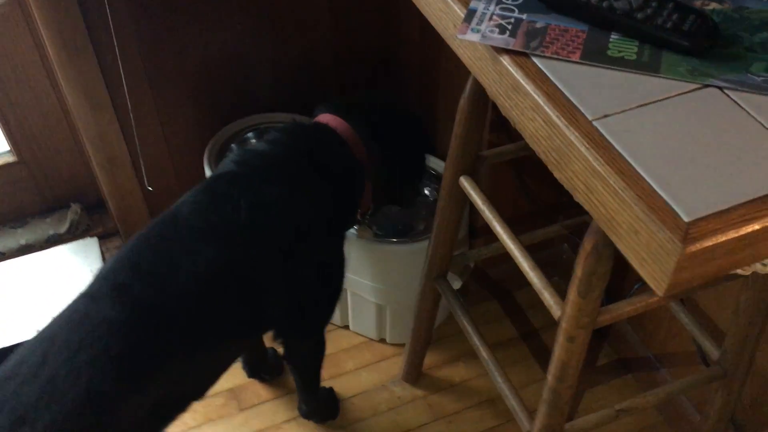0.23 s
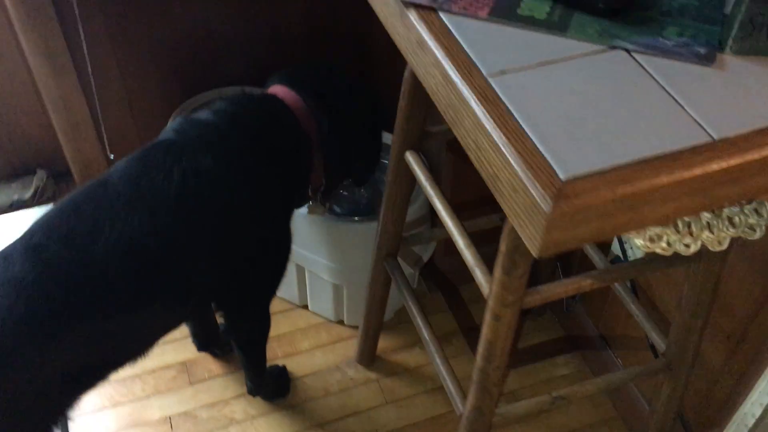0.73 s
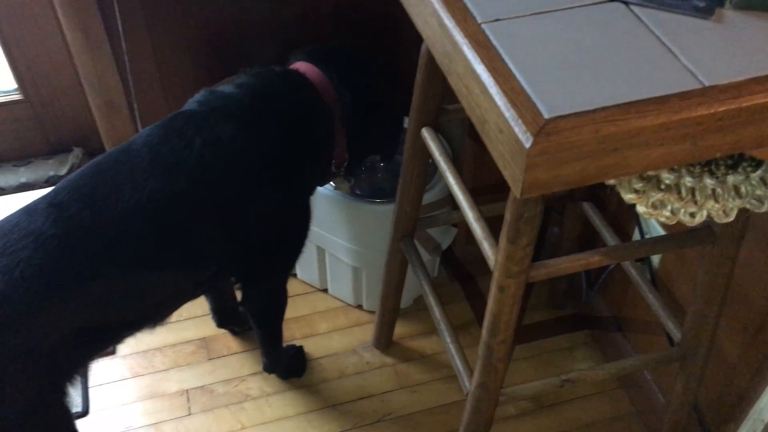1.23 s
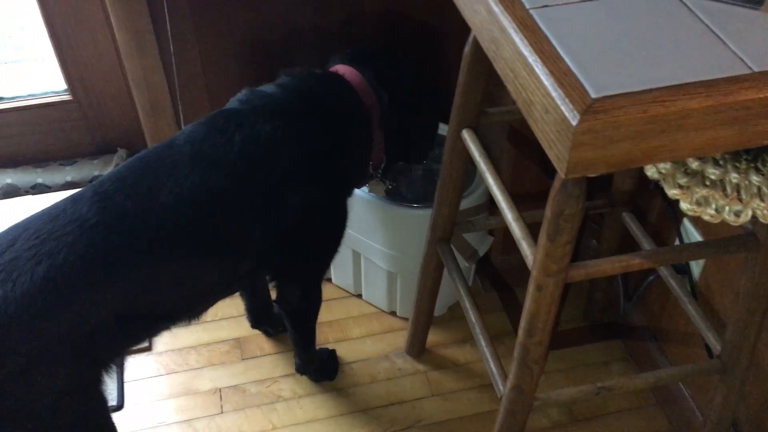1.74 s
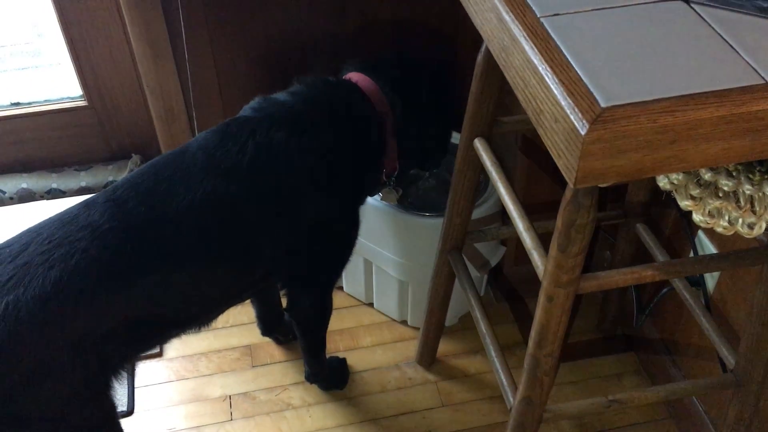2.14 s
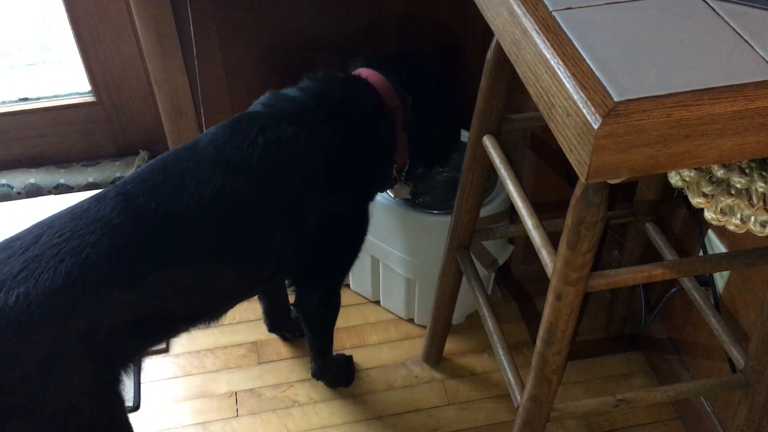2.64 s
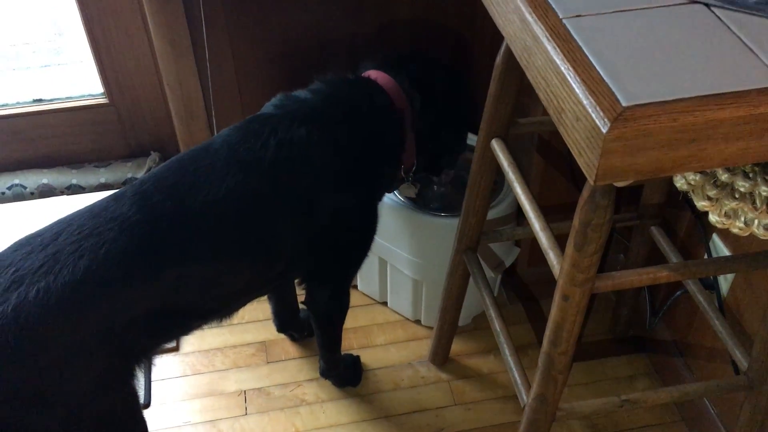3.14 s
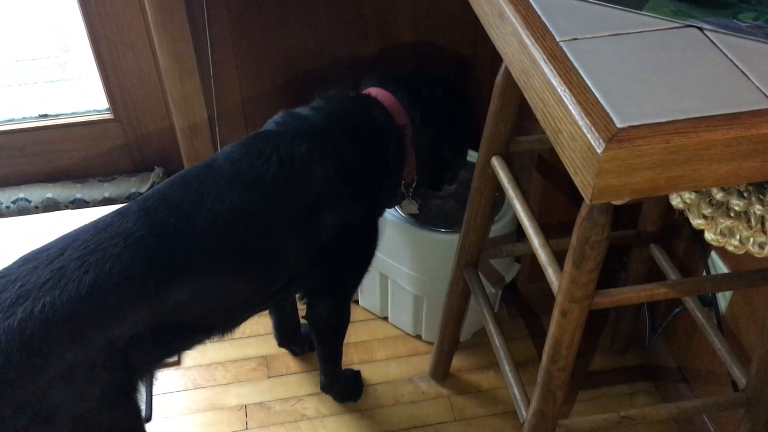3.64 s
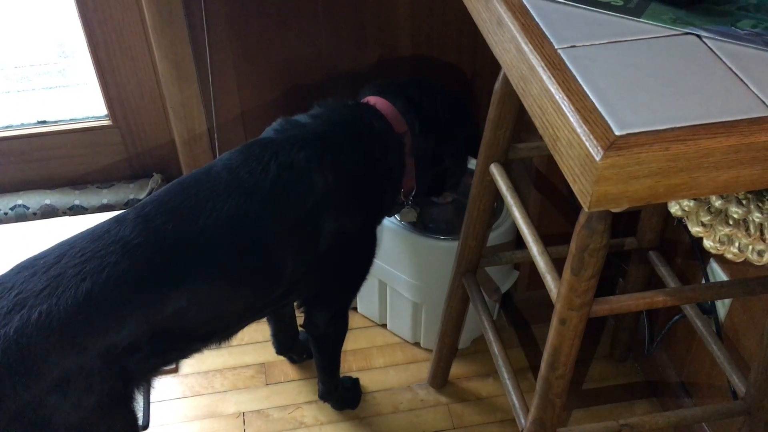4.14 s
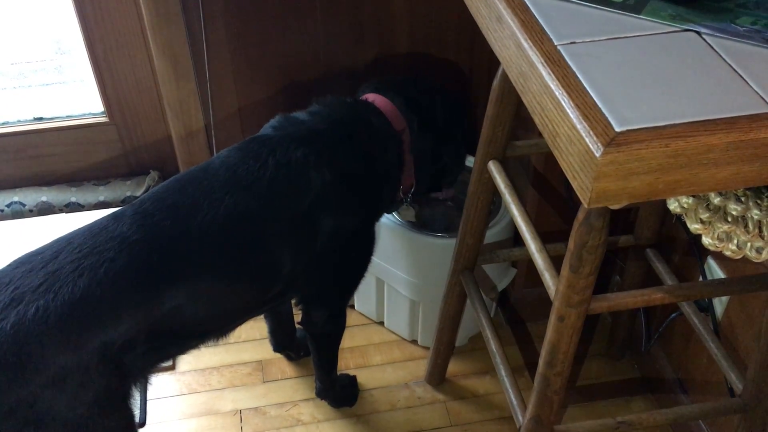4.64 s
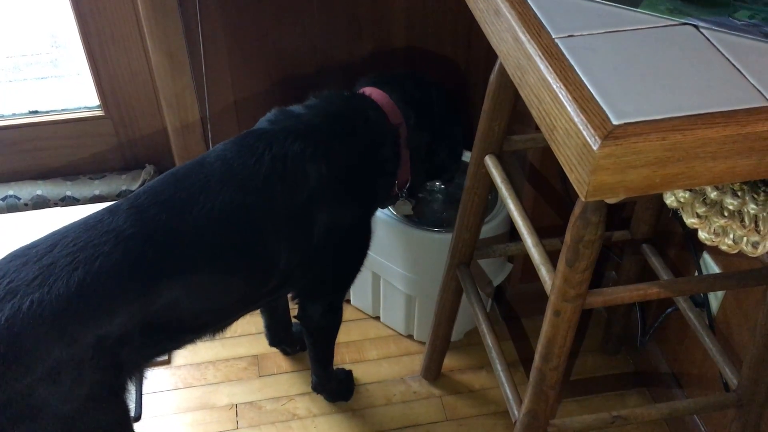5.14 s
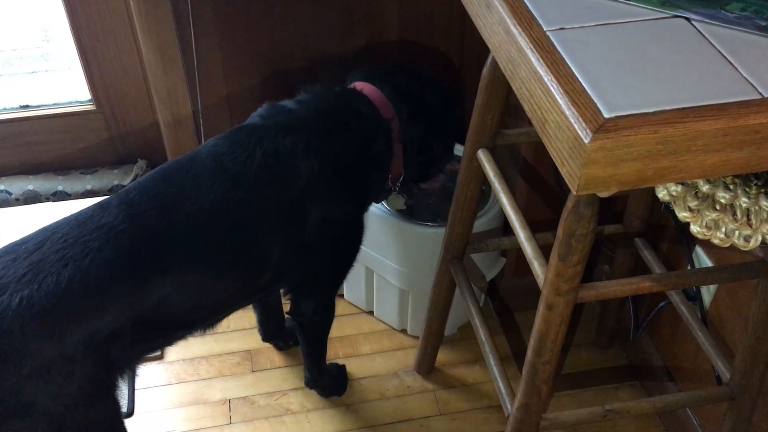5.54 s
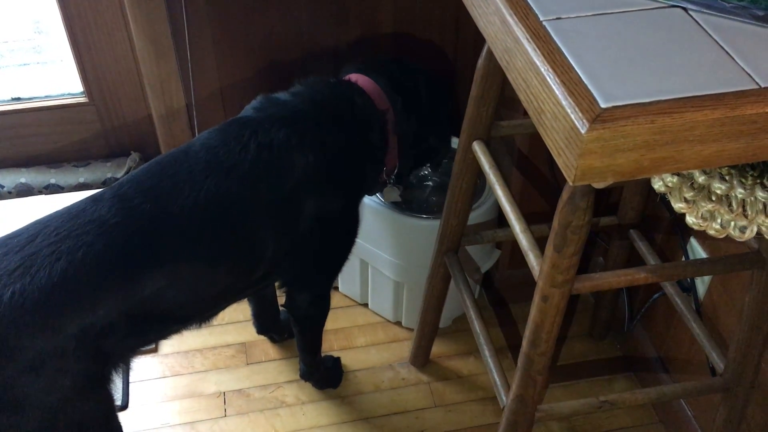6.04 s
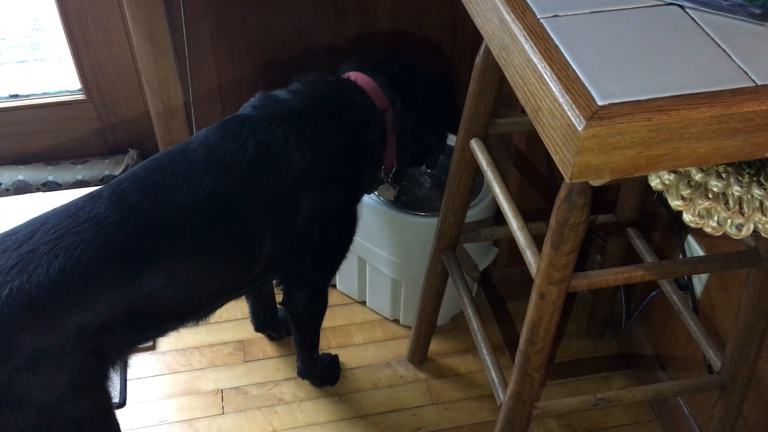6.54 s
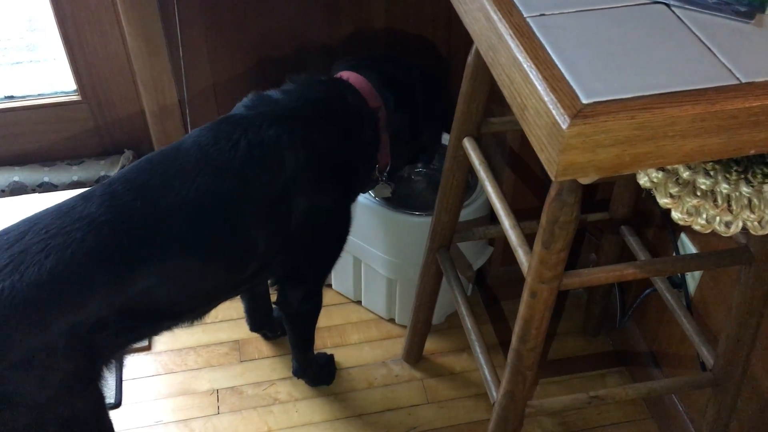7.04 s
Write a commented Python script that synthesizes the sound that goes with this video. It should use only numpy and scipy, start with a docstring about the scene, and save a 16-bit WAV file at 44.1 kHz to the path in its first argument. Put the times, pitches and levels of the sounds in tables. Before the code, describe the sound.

A dog laps water steadily from a bowl in a hollow stand, with wet plops, low thumps, splashy smacks and occasional tiny collar-tag clinks.

```python
"""Dog lapping water

A dog laps water from a bowl set in a hollow plastic stand, in the corner of a small kitchen.
Each lap thumps the stand (short tone pulses into resonators), traps air pockets that plop (rising, dying
tones), and throws droplets that smack and fizz (shaped noise); now and then the collar tag clinks
(decaying high modes), and once the dog blows softly through its nose (a hiss of coloured noise)."""
import sys
import numpy as np
from scipy import signal
from scipy.fft import rfft, irfft, next_fast_len
from scipy.io import wavfile
from scipy.ndimage import uniform_filter1d

SR = 44100
rng = np.random.default_rng(int(sys.argv[2]) if len(sys.argv) > 2 else 0)


def waveform_to_disk(signal):
    """Save audio, clipped to [-1, 1], as 16-bit WAV at the path in sys.argv[1]."""
    frames = np.transpose(np.atleast_2d(signal))
    scaled = np.clip(frames, -1, 1) * 32767
    samples = np.round(scaled).astype(np.int16)
    wavfile.write(sys.argv[1], SR, samples)


N = 321930  # length in samples

# Laps of the tongue: [entry t/s, length/s, churning level/dB, entry splash level/dB]
LAP_TIMES = [(0.279, 0.12, -57, -57), (0.477, 0.015, -52, -62), (0.692, 0.17, -61.5, -49),
             (1.251, 0.22, -66, -57.5), (1.597, .14, -58.5, -43.5), (1.995, 0.14, -58.5, -55),
             (2.477, 0.32, -67.5, -48), (2.874, 0.29, -60, -46), (3.288, 0.2, -60, -47.5),
             (3.864, 0.14, -63, -47.5), (4.214, 0.12, -55.5, -50), (4.75, 0.15, -60, -53.5),
             (5.092, 0.13, -54.5, -50), (5.616, 0.25, -61, -56), (6.019, 0.22, -58.5, -45),
             (6.443, 0.17, -55, -42.5), (6.945, 0.23, -61.5, -89)]
# Relative spectrum of flying droplets: [f/Hz, level/dB]
SPRAY_SPECTRUM = [(400, -46), (1500, -9), (4000, 5.5), (7000, 7.5), (10000, -2.5), (16000, -10.5)]
# Relative spectrum of stirred water: [f/Hz, level/dB]
CHURN_SPECTRUM = [(250, 15.5), (600, -10.5), (1500, 0), (4000, -5), (9000, -19), (16000, -17)]
# Relative spectrum of air through the nose, also used for the early hiss: [f/Hz, level/dB]
NOSE_SPECTRUM = [(800, 7.5), (6000, 6.5), (10000, 3), (16000, -4)]
SOFT_S = .0011  # build-up time constant of a wet contact


def gain_of(db):
    """Level to amplitude: 20 dB is a factor of ten."""
    return 10 ** (np.asarray(db) / 20)


def evened(x):
    """Normalisation: scales a signal to an rms value of 1."""
    return x / np.sqrt(np.mean(x ** 2) + 1e-20)


def read(points, hz):
    """Interpolation of a spectrum along a log-frequency axis."""
    f, value = np.transpose(points)
    return np.interp(np.log(hz + 1), np.log(f + 1), value)


def add(mix, s, sound):
    """Superposition: adds a sound to the mix from s seconds on."""
    part = mix[round(s * SR):][:len(sound)]
    part += sound[:len(part)]


def coloured(x, points):
    """Linear filtering: multiplies the Fourier transform by a spectrum."""
    size = next_fast_len(len(x))
    gain = gain_of(read(points, np.fft.rfftfreq(size, 1 / SR)))
    return irfft(rfft(x, size) * gain, size)[:len(x)]


def resonate(x, hz, width):
    """Resonance of gain 1 by heterodyning: shifts hz down to zero, smooths, and shifts back."""
    turn = np.exp(2j * np.pi * np.cumsum(hz * np.ones(len(x))) / SR)
    r = np.exp(-np.pi * width / SR)
    smooth = signal.lfilter([1 - r], [1, -r], x / turn)
    return 2 * (turn * smooth).real


def bubble(hz, t60, rise_s, glide):
    """Bubble oscillation: a dying tone whose pitch climbs as the pocket nears the surface; peak 1."""
    t = np.arange(int(t60 * SR) + 50) / SR
    tone = np.sin(2 * np.pi * hz * (t + glide * t ** 2 / (2 * t60)))
    tone *= gain_of(-60 * t / t60) * (1 - np.exp(-t / rise_s)) ** 2
    return tone / abs(tone).max()


def ragged(hz, width, decay_s, noise):
    """Narrow-band noise burst: a cluster of bubbles close in size excited together; peak 1."""
    t = np.arange(len(noise)) / SR
    burst = noise * np.exp(-t / decay_s) * (1 - np.exp(-t / SOFT_S))
    ring = resonate(resonate(burst, hz, width), hz, width)
    return ring / abs(ring).max()


def grains(per_s, spread_db):
    """Random impulse train: independent clicks of random sign, a few of them large."""
    size = gain_of(spread_db * np.minimum(rng.exponential(1, N), 4))
    return size * rng.choice([-1., 1.], N) * (rng.random(N) < per_s / SR)


def patchy(points, depth_db):
    """Modulated noise: its level wanders in patches of time and pitch, as many cavities open and close."""
    frames, hz = N // 64 + 5, np.fft.rfftfreq(256, 1 / SR)
    a, b, patches = rng.standard_normal((frames, 129, 3)).T
    patches = uniform_filter1d(patches, size=4, axis=0)  # along frequency
    patches = evened(uniform_filter1d(patches, size=12, axis=1))  # along time
    z = (a + 1j * b) * gain_of(read(points, hz)[:, None] + depth_db * patches)
    return evened(signal.istft(z, nperseg=256, noverlap=192)[1][:N])


def house_air():
    """Background noise: broadband air, strongest at low frequencies, with a slowly drifting level."""
    # Relative spectrum of the quiet house: [f/Hz, level/dB]
    air_spectrum = [(15, -86), (25, -7.5), (70, 6), (180, 2), (540, -17.5), (887, -28), (1070, -21),
                    (1790, -26.5), (9070, -40), (16000, -43)]
    drift = gain_of(3.7 * evened(uniform_filter1d(rng.standard_normal(N), size=6000)))
    return gain_of(-56) * drift * evened(coloured(rng.standard_normal(N), air_spectrum))


def early_hiss():
    """Resonance in noise: a faint hiss with a thin whistle in it, dying away after the first second."""
    fade = np.clip((1.5 - np.arange(N) / SR) / 0.17, 0, 1)
    hiss = patchy(NOSE_SPECTRUM, depth_db=1.5)
    whistle = gain_of(9.0) * resonate(hiss, 4350, 310)
    return gain_of(-73.5) * fade * (hiss + whistle)


def droplets():
    """Random impacts: stray drops from the muzzle tick faintly on the water, many each second."""
    decay = np.exp(-np.arange(600) / (0.0028 * SR))
    tick = decay * coloured(rng.standard_normal(600), SPRAY_SPECTRUM)
    return gain_of(-68) * signal.oaconvolve(grains(per_s=16, spread_db=3.0), tick)[:N]


def stirring():
    """Forced agitation: rises fast as the tongue enters, settles in two exponentials, flutters at random."""
    t, stir = np.arange(N) / SR, np.zeros(N)
    for s, length, db, _ in LAP_TIMES:
        after = np.maximum(t - s - length, 0)
        settle = np.exp(-after / .02) + gain_of(-15) * np.exp(-after / .15)
        stir += gain_of(db) * np.clip((t - s) / .008, 0, 1) * settle
    return stir * gain_of(4.55 * evened(uniform_filter1d(rng.standard_normal(N), size=700)))


def gurgles(stir):
    """Bubble population: random beads of air each ring at one of twenty pitches, the higher ones weaker."""
    beads = gain_of(-7.5) * stir * evened(grains(per_s=1200, spread_db=3.0))
    beads += gain_of(-75) * evened(grains(per_s=220, spread_db=3.0))  # a faint dribble, between laps too
    which, small = rng.integers(0, 20, N), np.zeros(N)
    for k, hz in enumerate(np.geomspace(500, 4000, num=20)):
        ring = evened(bubble(hz, .018 + 28 / hz, rise_s=.002, glide=.15))
        small += (600 / hz) ** .55 * signal.oaconvolve(beads * (which == k), ring)[:N] / 20
    return small


def churn():
    """Turbulence: stirred water makes a patchy wash, a low slosh, dense gurgles and flecks of spray."""
    stir = stirring()
    rocking = resonate(resonate(rng.standard_normal(N), 190, 147), 190, 147)
    slosh = gain_of(-0.5) * evened(rocking)  # the water rocks the stand
    fleck = np.exp(-np.arange(300) / 90) * coloured(rng.standard_normal(300), SPRAY_SPECTRUM)
    fleck = fleck / np.linalg.norm(fleck)
    landings = gain_of(-10.5) * stir * evened(grains(per_s=450, spread_db=4.5))
    wash = stir * (patchy(CHURN_SPECTRUM, depth_db=4.5) + slosh)
    return wash + gurgles(stir) + signal.oaconvolve(landings, fleck)[:N]


def plops():
    """Bubble resonance: each pocket swells with a rough burst around its own pitch, splits, rings the bowl air."""
    # Air pockets under the tongue: [t/s, main bubble level/dB, f/Hz]
    pockets = [(0.091, -46.5, 714), (0.28, -42, 654), (0.486, -37, 447), (0.691, -46, 702),
               (0.931, -55, 1083), (1.006, -59, 1080), (1.412, -35.5, 731), (1.544, -48.5, 614),
               (1.605, -40.5, 990), (1.7, -46, 630), (1.73, -45.5, 605), (1.809, -42, 642),
               (2.059, -37.5, 594), (2.107, -34, 646), (2.199, -43.5, 643), (2.217, -48.5, 862),
               (2.49, -46, 1050), (2.547, -45, 590), (2.594, -46.5, 706), (2.633, -47.5, 577),
               (2.695, -36.5, 745), (2.931, -30, 590), (3.089, -36.5, 636), (3.097, -45, 918),
               (3.268, -55, 590), (3.357, -47, 550), (3.408, -42, 595), (3.432, -45.5, 610),
               (3.896, -49, 1083), (3.899, -43, 590), (3.998, -45, 713), (4.007, -41.5, 943),
               (4.221, -45, 733), (4.274, -43, 660), (4.328, -41.5, 647), (4.428, -39, 614),
               (4.764, -43.5, 568), (4.804, -45, 594), (4.816, -35.5, 625), (4.912, -46.5, 600),
               (5.249, -42.5, 592), (5.316, -43, 699), (5.321, -46, 1000), (5.621, -47.5, 973),
               (5.68, -37, 605), (5.734, -38, 663), (6.032, -46, 700), (6.09, -44, 550), (6.228, -50, 660),
               (6.455, -43, 946), (6.525, -46, 505), (6.568, -42.5, 600), (6.679, -52.5, 597),
               (6.752, -48, 1070), (6.974, -51, 910), (7.003, -50.5, 613), (7.056, -43.5, 635),
               (7.072, -51, 650), (7.166, -46, 616)]
    # Resonances of the air over the water: [f/Hz, width/Hz, level/dB]
    bowl_modes = [(612, 60, -11), (970, 80, -15)]
    out = np.zeros(N)
    for (s, db, hz), noise in zip(pockets, rng.standard_normal((len(pockets), 3000))):
        add(out, s, gain_of(db) * bubble(hz, .042, rise_s=.0025, glide=.2))
        split_hz = hz * (1.08 + 0.15 * noise[0].clip(-2, 2))
        add(out, s + 0.00828, gain_of(db - 17.0) * bubble(split_hz, 0.015, rise_s=0.0044, glide=0.64))
        add(out, s, gain_of(db - 2.0) * ragged(hz, 1350, 0.0087, noise))
    return out + sum(gain_of(db) * resonate(out, hz, w) for hz, w, db in bowl_modes)


def thumps():
    """Forced and free vibration: brief pushes that sag in pitch leave the hollow stand ringing."""
    # Runs of even low pushes as the tongue drags through the bowl:
    # [first t/s, last t/s, first level/dB, last level/dB, f/Hz]
    shudders = [(0.302, .335, -35.5, -37.5, 203), (0.367, .433, -34, -40.5, 138),
                (0.716, .715, -32.5, -21, 165), (1.623, 1.707, -31.5, -34, 134),
                (2.021, 2.11, -31.5, -32.5, 132), (2.506, 2.508, -38.5, -38.5, 153),
                (2.899, 2.984, -30.5, -35, 135), (3.309, 3.433, -34, -34.5, 146),
                (4.241, 4.325, -34.5, -31, 129), (5.124, 5.209, -30, -32, 143),
                (6.046, 6.17, -29, -33, 150), (6.477, 6.571, -39, -35.5, 160),
                (6.991, 7.022, -40, -39.5, 145)]
    # Single thumps of the throat as a mouthful goes down: [peak t/s, level/dB, f/Hz]
    gulps = [(.506, -30.5, 244), (.535, -36, 183), (.758, -35, 168), (1.352, -38, 215), (2.145, -34.5, 200),
             (2.638, -34.5, 198), (3.031, -34.5, 192), (3.942, -34.5, 211), (4.364, -34.5, 207),
             (4.858, -34.5, 212), (6.614, -46, 187)]
    # Resonances of the stand: [f/Hz, width/Hz, level/dB]
    stand_modes = [(92, 3.1, -6), (131.6, 4.7, -13.5), (156.2, 4, 1.5), (244, 7.3, 8)]
    push_gap_s, dip = .029, 0.17  # dip: share by which the pitch sinks late in a run
    pushes = list(gulps)
    for first, last, first_db, last_db, hz in shudders:
        for u in np.linspace(0, 1, num=1 + round((last - first) / push_gap_s)):
            sunk = 1 - dip * np.sin(np.pi * u ** 3.9)
            pushes.append((first + u * (last - first), first_db + u * (last_db - first_db), hz * sunk))
    out, t = np.zeros(N), np.arange(-700, 1500) / SR
    swell = np.exp(-(t / np.where(t < 0, .0045, .007)) ** 2)  # rises faster than it falls
    for (s, db, hz), turn in zip(pushes, rng.random(len(pushes))):
        tone = np.cos(2 * np.pi * (hz * t * (1 - 15 * t) + turn))
        add(out, s + t[0], gain_of(db) * swell * tone)
    return out + sum(gain_of(db) * resonate(out, hz, w) for hz, w, db in stand_modes)


def smacks():
    """Impact on liquid: a pitched pop, a bright crack of spray of varying colour, and a duller wet tail."""
    # Smacks of tongue and droplets during and after the laps: [t/s, pop level/dB, pop f/Hz, spray level/dB]
    contacts = [(.324, -46.5, 3040, -74), (.3704, -41.5, 12400, -55), (.4176, -44.5, 5660, -55),
                (.5082, -43, 3380, -71), (.7921, -39, 4200, -44.5), (.822, -41.5, 1800, -72),
                (1.3003, -46, 3200, -48), (1.318, -45, 3230, -52), (1.404, -48, 2800, -67),
                (1.4125, -51, 5000, -38.5), (1.4607, -50, 1560, -70), (1.5429, -48.5, 1700, -63.5),
                (1.6843, -39.5, 8000, -49), (1.7215, -39.5, 3840, -49), (1.8114, -47.5, 7500, -44.5),
                (2.1028, -38.5, 3250, -42.5), (2.1986, -48, 2650, -50.5), (2.378, -69, 5500, -59.5),
                (2.5324, -48, 3500, -50), (2.5431, -42.5, 1680, -55.5), (2.5716, -48, 4000, -53),
                (2.607, -35, 6730, -42.5), (2.6834, -40, 7280, -45.5), (2.772, -47.5, 2350, -67),
                (2.9298, -40, 2710, -37.5), (2.996, -44, 5950, -39), (3.0884, -47, 8340, -42.5),
                (3.139, -39.5, 4140, -59), (3.3911, -48.5, 2820, -41), (3.418, -39.5, 1660, -71),
                (3.8853, -44.5, 5660, -49), (4.3007, -55, 7160, -43.5), (4.4194, -48.5, 2490, -48.5),
                (4.6239, -43.5, 5700, -77), (4.7919, -43.5, 4120, -47.5), (4.9303, -38, 3900, -44),
                (4.932, -37, 2150, -72), (5.106, -42.5, 1820, -67), (5.172, -44.5, 1960, -52),
                (5.2142, -45, 4200, -41.5), (5.3088, -47.5, 2200, -48.5), (5.382, -55, 3100, -56),
                (5.6749, -39.5, 3470, -46), (5.7341, -38, 3500, -36.5), (5.84, -46, 2240, -60),
                (6.0815, -40, 1470, -45), (6.1418, -41.5, 1687, -37), (6.5227, -41.5, 1330, -43),
                (6.5785, -43.5, 1890, -47), (7.0, -51, 3330, -45), (7.0703, -41.5, 1930, -40.5)]
    out, t = np.zeros(N), np.arange(3000) / SR
    # each entry of the tongue pops around 2310 Hz, 5 dB under its splash
    pitches = 2310 * np.exp(0.322 * rng.standard_normal(len(LAP_TIMES)))
    rows = list(contacts) + [(s, db - 5, hz, db) for (s, _, _, db), hz in zip(LAP_TIMES, pitches)]
    chance = rng.standard_normal((len(rows), 4, len(t)))
    bands = np.geomspace(1000, 16000, num=9)
    for (s, db, hz, spray_db), (pop, noise, wet, lumps) in zip(rows, chance):
        add(out, s, gain_of(db) * ragged(hz, 0.21 * hz, 0.0015, pop))
        # the same pitch rings on longer, rising
        add(out, s, gain_of(db - 4) * ragged(hz * (1 + 1.5 * t), .13 * hz, .012, pop[::-1]))
        colour = np.transpose([bands, read(SPRAY_SPECTRUM, bands) + 7 * lumps[:len(bands)]])
        crackle = gain_of(1.9 * evened(uniform_filter1d(lumps, size=60)))
        late = rng.uniform(.003, .012)  # delay in s of a weaker second contact
        strikes = np.exp(-t / 0.0032) + 0.37 * np.exp(-((t - late) / 0.0032) ** 2)
        crack = strikes * evened(coloured(noise, colour))
        tail = gain_of(-8) * np.exp(-t / .02) * evened(coloured(wet, CHURN_SPECTRUM))
        add(out, s, gain_of(spray_db) * crackle * (crack + tail) * (1 - np.exp(-t / SOFT_S)))
    return out


def snort():
    """Flow noise: a soft hiss of air through the nose, with an envelope linear in dB."""
    # Envelope of the breath: [t/s, level/dB]
    breath = [(3.55, -62), (3.651, -56), (3.748, -61), (3.87, -63)]
    s, db = np.transpose(breath)
    level = gain_of(np.interp(np.arange(N) / SR, s, db, -120, -120))
    return level * evened(coloured(rng.standard_normal(N), NOSE_SPECTRUM))


def collar():
    """Modal vibration: the struck tag rings in a few high modes, wobbling throughout, with a fast first drop."""
    # Strikes of the tag: [t/s, level/dB]
    clinks = [(3.9867, -49), (4.892, -48), (5.1644, -46.5), (5.8064, -43), (6.0723, -50), (6.239, -53),
              (6.4705, -53.5), (7.1516, -48)]
    # Modes of the metal tag: [f/Hz, mean level/dB, t60/s]
    tag_modes = [(5750, -8, .03), (8584, 6, 0.089), (9400, -6, .05), (12700, -9, .06), (15000, -9, .03)]
    t, out = np.arange(9000) / SR, np.zeros(N)
    quick = .09 + np.exp(-t / .005)
    varies = np.arange(len(tag_modes)) != 1  # the second mode keeps its level from strike to strike
    for (s, db), spot in zip(clinks, rng.standard_normal((len(clinks), len(tag_modes)))):
        ring = np.zeros(len(t))
        for (hz, mode_db, t60), u in zip(tag_modes, spot * varies):
            ring += gain_of(mode_db + 4 * u - 60 * t / t60) * np.sin(2 * np.pi * hz * t)
        wobble = 1 + .6 * np.cos(2 * np.pi * 60 * np.exp(.4 * spot[1]) * t)
        add(out, s, gain_of(db) * ring * quick * wobble * (1 - np.exp(-t / 0.00014)))
    return out


def kitchen(x):
    """Reverberation: convolution with sparse taps of random sign, each band dying at its own speed."""
    # Decay of the room: [f/Hz, t60/s]
    room_decay = [(200, 0.39), (1000, 0.12), (4000, 0.23)]
    taps = np.zeros(SR // 2)
    at = np.arange(150, len(taps) - 20, 20)
    taps[at + rng.integers(0, 20, len(at))] = rng.choice([-1., 1.], len(at))
    hz, t, z = signal.stft(taps, SR, nperseg=256)
    decay = gain_of(-60 * t / read(room_decay, hz)[:, None])
    tail = signal.istft(z * decay, SR, nperseg=256)[1]
    return signal.fftconvolve(x, tail / np.linalg.norm(tail))[:N]


def scene():
    """Superposition of the dog in the corner, the room's answer, and the quiet, uneven air of the house."""
    air = house_air() + early_hiss()
    near = droplets() + churn() + plops() + smacks() + collar()
    low = thumps()
    room = kitchen(gain_of(-8.5) * near + gain_of(-16.5) * low)
    return (near + low + room + snort() + air)[None]


def record(dry):
    """Band limitation: a linear-phase low-pass filter with its edge at 15.9 kHz."""
    lowpass = signal.firwin(511, 15900, window=("kaiser", 9), fs=SR)
    return signal.oaconvolve(dry, lowpass[None], "same")


dry = scene()
out = record(dry)
waveform_to_disk(out)
```